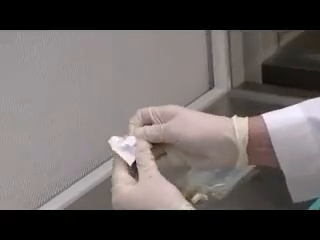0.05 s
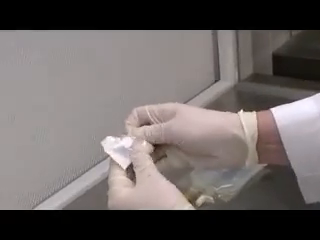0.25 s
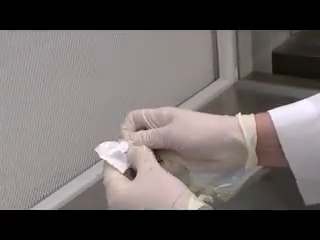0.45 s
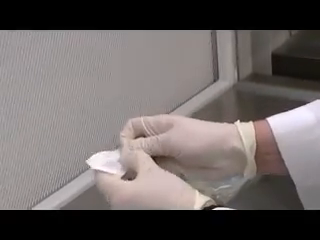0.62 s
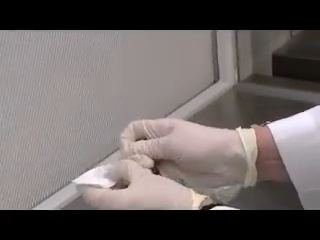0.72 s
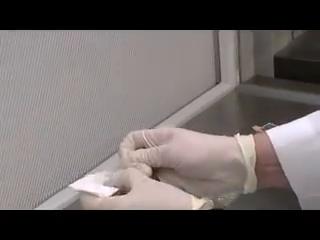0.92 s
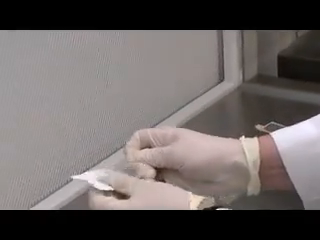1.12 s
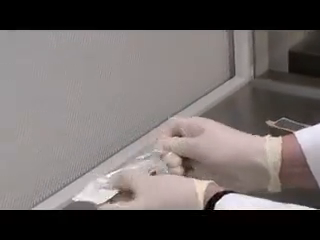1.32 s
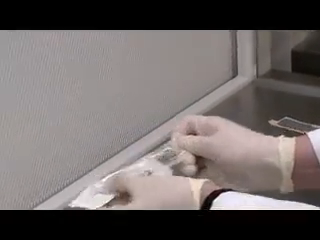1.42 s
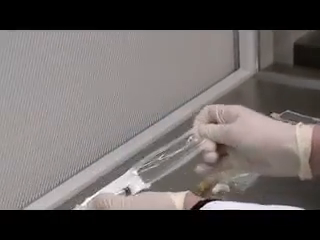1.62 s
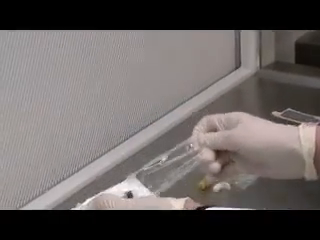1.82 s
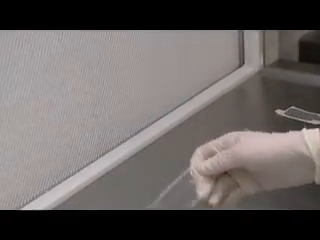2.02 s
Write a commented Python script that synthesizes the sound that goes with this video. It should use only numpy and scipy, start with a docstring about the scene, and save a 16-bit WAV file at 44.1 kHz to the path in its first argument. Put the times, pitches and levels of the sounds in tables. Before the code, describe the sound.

A paper and plastic wrapper is peeled open close by, starting with light, scattered crinkles and snaps. A short burst of crackling comes at about 0.8 seconds. From around 1.2 to 1.75 seconds the seam peels apart in a denser, louder crackle with sharp snaps, then thins to a few soft ticks by 2 seconds. A faint fan hums steadily throughout, in the tight space of a steel cabinet.

```python
"""A paper and plastic syringe wrapper snaps and crackles open in gloved hands, over a steady fan. Creases
buckle one by one, each a short cluster of cracks ringing at its own pitch, some with a higher overtone as well.
As the seam peels, the glue lets go in a dense crackle that rings the film pocket and the sheet. The hard walls
of the steel cabinet around it answer quickly."""
import sys
import numpy as np
from scipy import signal
from scipy.fft import rfft, irfft
from scipy.io import wavfile

SR = 44100
rng = np.random.default_rng(int(sys.argv[2]) if len(sys.argv) > 2 else 0)


def to_wav(s):
    """Save 16-bit WAV."""
    ch = np.atleast_2d(s).T  # columns
    pcm = np.round(np.clip(ch, -1, 1) * 32767)  # PCM
    wavfile.write(sys.argv[1], SR, pcm.astype(np.int16))


N = 90625


def from_db(db):
    """dB to gain."""
    return 10 ** (np.asarray(db) / 20)


def rms_one(x):
    """Scale to rms 1."""
    return x / np.sqrt(np.mean(x ** 2) + 1e-20)


def peak_one(x):
    """Scale to peak 1."""
    return x / np.abs(x).max()


def at_bins(points):
    """Interpolate (freq_hz, value) points onto the FFT bins, in log frequency."""
    bin_hz = np.maximum(np.arange(N // 2 + 1) * SR / N, 1)
    freq_hz, values = np.transpose(points)
    return np.interp(np.log(bin_hz), np.log(freq_hz), values)


def colour(x, spectrum):
    """Filter by (freq_hz, gain_db) points; scale to rms 1."""
    return rms_one(irfft(rfft(x) * from_db(at_bins(spectrum)), N))


def butter(x, order, edge_hz, kind="low"):
    """Butterworth filter."""
    return signal.sosfilt(signal.butter(order, edge_hz, kind, fs=SR, output="sos"), x)


def resonance(x, hz, width_hz, stages=1):
    """Two-pole resonators in series."""
    r = np.exp(-np.pi * width_hz / SR)
    for _ in range(stages):
        x = signal.lfilter([1 - r * r, 0, r * r - 1], [1, -2 * r * np.cos(2 * np.pi * hz / SR), r * r], x)
    return x


def ring_modes(drive, modes):
    """Parallel resonators, normalised for width, alternating in sign."""
    return sum((-1) ** k * from_db(db) * resonance(drive, hz, width_hz) / np.sqrt(2 * np.pi * width_hz / SR)
               for k, (hz, width_hz, db) in enumerate(modes))


def drift(rate_hz):
    """Smooth random wander, rms 1."""
    r = np.exp(-2 * np.pi * rate_hz / SR)
    slow = signal.lfilter([1], [1, -2 * r, r * r], rng.standard_normal(N + SR))[SR:]
    return rms_one(slow - slow.mean())


def fan():
    """Steady air noise, stronger at the duct resonances; the lows are nearly mono."""
    # freq_hz, gain_db
    air_spectrum = [(21, -43), (35, -6.5), (296, -6), (350, -6), (627, -13.5), (725, -13), (947, -20.5),
                    (1300, -20.5), (1460, -21), (1610, -29), (3260, -35), (8810, -45), (11500, -70),
                    (15000, -105), (22000, -120)]
    # pitch_hz, width_hz, level_db
    duct_modes = [(67.6, 41, -56), (195.5, 16.7, -51), (248.3, 32, -54), (301.04, 7.4, -56)]
    # freq_hz, correlation
    stereo_likeness = [(60, 0.89), (240, 0.92), (930, 0.63), (3690, 0.18), (14500, 0.76)]
    alike = at_bins(stereo_likeness)
    mid, side = rfft(rng.standard_normal((2, N)))
    noise = irfft(np.sqrt(1 + alike) * mid + np.sqrt(1 - alike) * side * [[1], [-1]], N)
    air = from_db(-48.5 + 0.03 * drift(rate_hz=1)) * colour(noise, air_spectrum)
    hum = sum(from_db(db) * rms_one(resonance(rng.standard_normal(N), hz, width_hz, stages=2))
              for hz, width_hz, db in duct_modes)
    return air + hum


def cabinet(x):
    """Reflections: one bench echo, dense steel-wall echoes, a fainter and longer room tail."""
    bench_s, bench_db, bench_pan_db = 0.0034, -15, -1.5
    wall_db, wall_t60_s, room_db, room_t60_s = -8, 0.039, -10, 0.15
    t = np.arange(SR // 3) / SR
    tail = sum(from_db(db - 60 * t / t60_s) / np.sqrt(t60_s * SR / np.log(1e6))
               for db, t60_s in ((wall_db, wall_t60_s), (room_db, room_t60_s)))
    mid, side = rng.standard_normal((2, len(t))) * tail * (t > bench_s)
    mid = butter(mid, 1, edge_hz=1860)
    side = from_db(-3.5) * butter(side, 1, edge_hz=480, kind="high")
    response = np.array([mid + side, mid - side])
    response[:, int(bench_s * SR)] += from_db(bench_db + bench_pan_db * np.array([.5, -.5]))
    return signal.fftconvolve(x, response, axes=1)[:, :N]


def seam_peel():
    """Glue and fibres let go in clumped grains: crackle and fine fizz, ringing the pocket and sheet."""
    # time_s, crackle_db; then re crackle: pocket_drive_db, fizz_db, sheet_drive_db
    peel_effort = [(0, -66.5, 8.5, -9, -20), (.12, -61, -5, -6, -14), (.17, -64, 6, -18, -15),
                   (.3, -71, 5, -7, -16), (.33, -58.5, -3.5, -9.5, -16), (.54, -58, -2.5, -11, -24),
                   (.6, -63.5, 0, -17, -18), (.66, -68, 5.5, -2, -22), (0.76, -57.5, -20, -22, -19),
                   (0.777, -43, 3, 4.5, -34), (.808, -44, 7, 5.5, -36), (0.838, -40.5, 9.5, 1, -22),
                   (0.867, -56, -1.5, -21, -7), (.96, -67, 7.5, -8, -21), (1.01, -50, 3, -3, 2),
                   (1.039, -62, -7, -9, -30), (1.106, -50.5, 1.5, 3.5, 6), (1.149, -55, 6.5, -18, 0),
                   (1.222, -59, 1.5, -19, -11), (1.271, -38, -4, 2, -16), (1.332, -49, 8, -11, -16),
                   (1.362, -41, 1, 2, -2.5), (1.426, -36.5, -1, -10.5, -2),
                   (1.462, -45.5, -6.5, -10.5, -4.5), (1.511, -35, 5, -1, -1), (1.57, -37.5, 4.5, -5, 1.5),
                   (1.62, -33, 3.5, -10, -6.5), (1.687, -35, -2.5, -4, 1.5), (1.729, -49.5, 5, -1.5, -26),
                   (1.802, -61.5, 1.5, -13, -8), (1.879, -73.5, 5, -12, -16), (1.93, -51.5, -1, -7, -27),
                   (2.05, -64.5, 4.5, -15, -5)]
    # freq_hz, gain_db
    crackle_spectrum = [(820, -12), (1400, -5), (1910, -4), (2370, 3), (2690, -4), (3230, 0), (4870, -9),
                        (7000, -12.5), (9100, -15), (15400, -120)]
    # freq_hz, gain_db
    fizz_spectrum = [(3530, -22.5), (6000, 3.5), (9390, -7), (13000, -9.5), (14000, 4), (15000, -43)]
    # film pocket: pitch_hz, width_hz, gain_db
    pocket_modes = [(848, 103, -9.5), (1098, 95, -7), (1360, 980, -10.5)]
    # stretched sheet: pitch_hz, width_hz, gain_db
    sheet_modes = [(284, 60, -14.5), (411, 120, -6.5), (635, 59, -17.5)]
    grains_per_s, spread_db, clump_db, fizz_clump_db = 8000, 3.0, 3, 6.5
    time_s, *curves = np.transpose(peel_effort)
    crackle_db, pocket_db, fizz_db, sheet_db = (np.interp(np.arange(N) / SR, time_s, c) for c in curves)
    onsets = rng.random(N) < grains_per_s / SR
    strengths = from_db(spread_db * np.minimum(rng.exponential(1, N), 5))
    grains = rms_one(onsets * strengths * rng.choice([-1, 1], N))
    effort = from_db(crackle_db + clump_db * drift(rate_hz=55.6))
    crackle = colour(grains, crackle_spectrum)
    fizz = from_db(fizz_db + fizz_clump_db * drift(rate_hz=73)) * colour(grains, fizz_spectrum)
    pocket = ring_modes(grains * effort * from_db(pocket_db), pocket_modes)
    sheet = ring_modes(grains * effort * from_db(sheet_db), sheet_modes)
    return effort * (crackle + fizz) + pocket + sheet


def crease_snaps():
    """Each crease buckles: small cracks swell around a main crack, ring at one pitch, fade to a rustle; a
    crease can also ring a higher overtone, given as a row of its own."""
    # start_s, peak_db, pitch_hz, bass_db, treble_db, broad_db (these three re ring), decay_s; a row just after
    # another (0.7728 s) adds that crease's higher overtone ring
    creases = [(0.0305, -44, 2880, -26, -20, -16, 0.0027), (0.1176, -13.5, 4590, 1.5, -1, 12, 0.001),
               (0.1335, -32.5, 7000, -13, -26, -21, 0.0027), (0.2023, -42, 2250, -9, 16, -12, 0.002),
               (0.311, -26.5, 3360, 1, -40, 7, 0.0033), (0.3562, -32, 7250, -28, -16, 6, 0.0018),
               (0.3707, -22.5, 5700, -16, 0, -1, 0.00098), (0.401, -28, 3640, -39, -1.5, -19, 0.0015),
               (0.43, -35, 4260, -4.5, -25, -1, 0.003), (0.4702, -28.5, 2770, -23, -34, 7, 0.00098),
               (0.4874, -49, 2620, -17, 14, -23, 0.002), (0.497, -36, 3400, -18, 14, -17, 0.0018),
               (0.5066, -34.5, 3660, -16, -12, -8, 0.002), (0.526, -29, 3150, -30, -8, 15, 0.0025),
               (0.5375, -31.5, 3300, -1.5, -30, 1.5, 0.0023), (0.633, -23.5, 6700, -11, -27, 11, 0.005),
               (0.6506, -26.5, 7000, -30, -19, 2.5, 0.0074), (0.7035, -13, 3240, -11, -27, 5, 0.0016),
               (0.7379, -24, 3330, -3, 3, 7, 0.0029), (0.7724, -11, 2990, -16, -2, -12, 0.003),
               (0.7728, -15.5, 5530, -27, -10, -22, 0.0043), (0.7768, -18.5, 3000, -38, -26, -10, 0.0011),
               (0.7818, -13.5, 3280, -6.5, -19, -27, 0.0014), (0.788, -20, 3300, -12, -21, -23, 0.00069),
               (0.8004, -26, 2910, -7, 3, -17, 0.002), (0.8159, -16.5, 2980, -2, -0.5, -5, 0.0017),
               (0.8237, -11.5, 3080, -29, -35, -38, 0.00099), (0.8304, -13, 3030, -8, -36, -31, 0.0024),
               (0.839, -25, 2870, 13, -16, -2, 0.0017), (0.9164, -34.5, 3600, 6, -26, 10, 0.0022),
               (0.9661, -17, 6160, -41, 9.5, 6, 0.0053), (0.9963, -40, 3440, -26, -20, -12, 0.0017),
               (1.0038, -21, 3600, 1, 6.5, 13, 0.0022), (1.067, -39.5, 3370, -20, -18, -5, 0.002),
               (1.0857, -31.5, 3380, -16, 5, -14, 0.0022), (1.0974, -23, 3420, -21, 1, -6, 0.0018),
               (1.109, -31, 3070, -17, -8, -2, 0.0014), (1.156, -38.5, 2400, -4, -4, -10, 0.0025),
               (1.182, -32, 8640, -15, -12, 1, 0.0014), (1.192, -33.5, 3530, -15, -14, 5.5, 0.0017),
               (1.23, -21, 8700, -26, -10, 6.5, 0.0034), (1.246, -21, 3260, -7, -11, -15, 0.00083),
               (1.2624, -10, 9310, -36, 5, -9.5, 0.0011), (1.2755, -23, 3630, -20, 2, -4, 0.002),
               (1.2819, -24.5, 2570, -24, -13, -3, 0.0019), (1.2992, -18, 3520, -27, 9, -15, 0.004),
               (1.306, -8.5, 7600, -22, 5, 13, 0.0014), (1.343, -12.5, 3700, -9, 7, 12, 0.0015),
               (1.387, -17.5, 2500, -22, 10, -4, 0.0011), (1.4162, -23.5, 3300, -10.5, 2, -7, 0.0019),
               (1.432, -11, 3440, -26, 12, -13, 0.001), (1.4698, -19, 7900, -28, 8, -16, 0.0023),
               (1.489, -17.5, 2600, -1.5, 7.5, 3, 0.0017), (1.507, -10, 7400, -6, 26, 7, 0.0018),
               (1.5154, -17, 3400, -15, 2, -9, 0.0017), (1.5331, -12.5, 4230, 3, 4, -2, 0.00094),
               (1.543, -11, 5240, -6.5, 5, -10, 0.0012), (1.55, -14.5, 2680, -15, 8, 3, 0.001),
               (1.5896, -8.5, 8200, -2, -5, 2.5, 0.0022), (1.6013, -12, 2180, -14, 21, -9, 0.0012),
               (1.6343, -15, 7000, -3, 7, 7, 0.0018), (1.6436, -23, 7000, -2, 5, -13, 0.0022),
               (1.6615, -15.5, 2330, -1.5, 2, -19, 0.0012), (1.6744, -12.5, 6850, -21, -2, -3, 0.001),
               (1.678, -13.5, 3700, -25, -3, -2, 0.0028), (1.687, -15, 3320, -20, 8.5, -2, 0.0017),
               (1.7004, -14, 8060, -42, 1, 8, 0.0042), (1.7051, -15.5, 7670, -17, 6, -12, 0.0021),
               (1.7385, -16.5, 3750, -29, -3, 14, 0.0036), (1.7844, -48, 2320, -14, -22, -13.5, 0.0014),
               (1.8893, -42, 8500, -7, -11, -23, 0.0041), (1.91, -25.5, 3820, -28, 16.5, 13, 0.0053),
               (1.9234, -24.5, 3740, 0.5, -35, -1, 0.0016), (1.9427, -28, 2370, -24, -25, 5, 0.0031),
               (1.9795, -26.5, 3280, -33, -39, -4, 0.0046), (2.0132, -31.5, 2490, -21, -40, 1, 0.0032)]
    cracks_per_s, spread_db, ring_q, pan_spread_db = 6000, 4.0, 3.11, 2
    build_up_s, rustle_db, rustle_decay_s = 0.0007, -23.5, 0.02
    main_delay_s, main_db = 0.0006, 5   # level re the largest small crack
    size = 4096
    t = np.arange(size) / SR
    swell = (1 - np.exp(-t / build_up_s)) ** 2
    rustle = from_db(rustle_db) * np.exp(-t / rustle_decay_s)
    out = np.zeros((2, N + size))
    for start_s, peak_db, pitch_hz, bass_db, treble_db, broad_db, decay_s in creases:
        impulses = (rng.random(size) < cracks_per_s / SR) * rng.choice([-1, 1], size)
        strengths = from_db(spread_db * rng.standard_normal(size))
        cracks = impulses * strengths * swell * (np.exp(-t / decay_s) + rustle) + 1e-12
        cracks[int((build_up_s + main_delay_s) * SR)] = from_db(main_db) * np.abs(cracks).max()
        ring = peak_one(resonance(cracks, pitch_hz, pitch_hz / ring_q, stages=2))
        low_band = butter(cracks, 2, (1420, 2610), "band")
        bass = from_db(bass_db) * peak_one(butter(low_band, 2, (440, 2800), "band"))
        broad = from_db(broad_db) * peak_one(butter(cracks, 2, (1970, 8000), "band"))
        treble = from_db(treble_db) * peak_one(butter(cracks, 2, (4870, 12600), "band"))
        pan_db = pan_spread_db * rng.standard_normal() * np.array([[.5], [-.5]])
        i = int((start_s - build_up_s) * SR)
        out[:, i:i + size] += from_db(peak_db + pan_db) * peak_one(ring + bass + broad + treble)
    return out[:, :N]


def scene():
    """Wrapper, its reflections and the fan, in stereo."""
    wrapper = crease_snaps() + seam_peel()
    return wrapper + cabinet(wrapper) + fan()


def record(dry):
    """Microphone roll-off in the top octave, then a steep low-pass."""
    mic_hz, stop_hz = 11400, 16400
    soft = butter(dry, 6, mic_hz)
    return signal.sosfilt(signal.cheby2(12, 70, stop_hz, fs=SR, output="sos"), soft)


dry = scene()
out = record(dry)
to_wav(out)
```